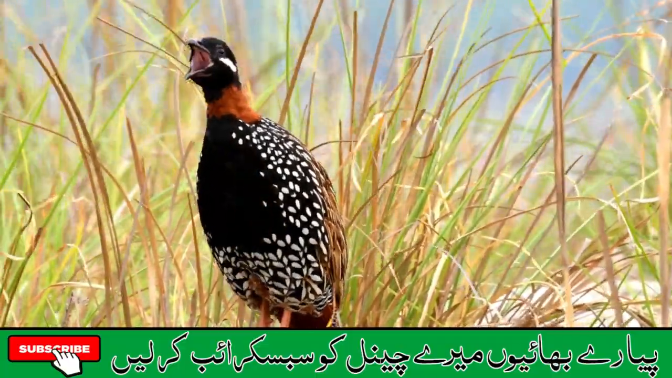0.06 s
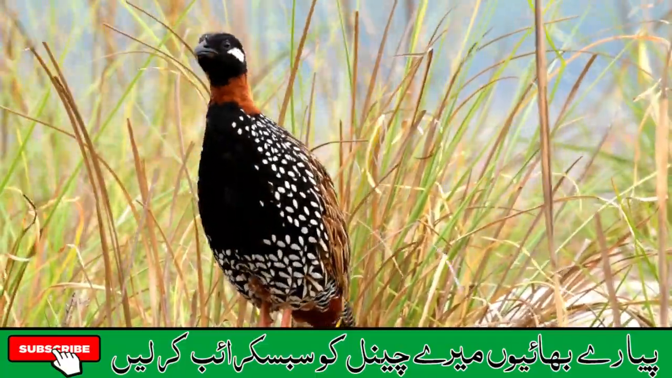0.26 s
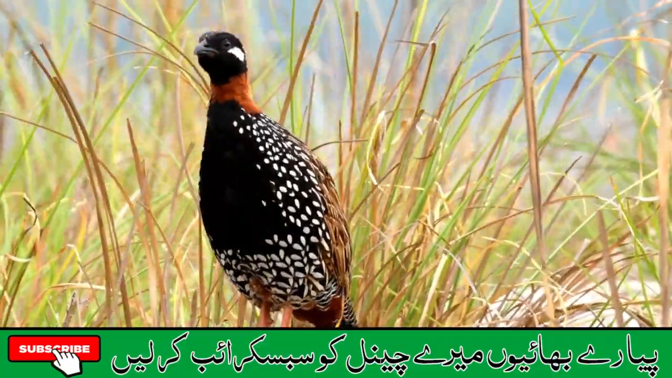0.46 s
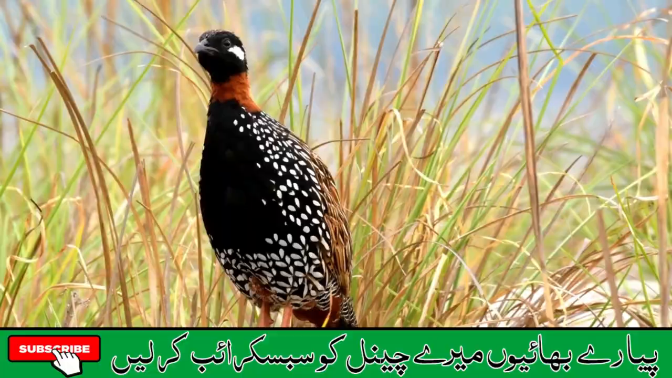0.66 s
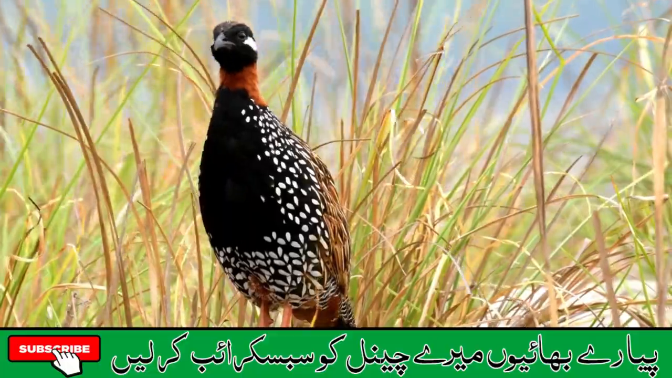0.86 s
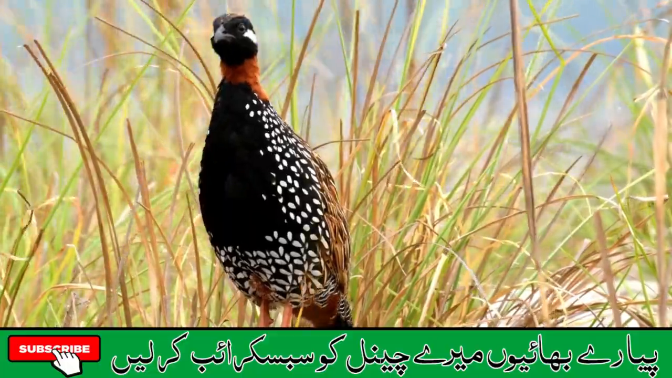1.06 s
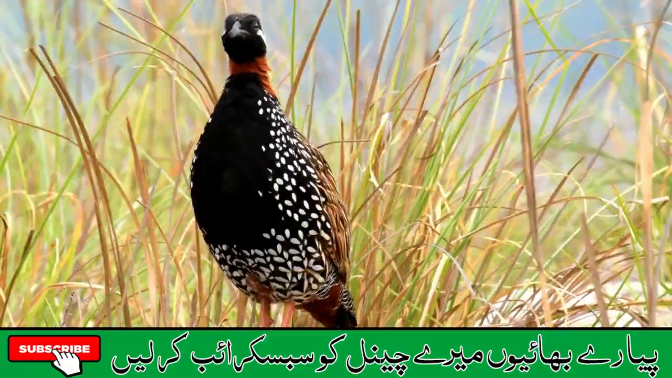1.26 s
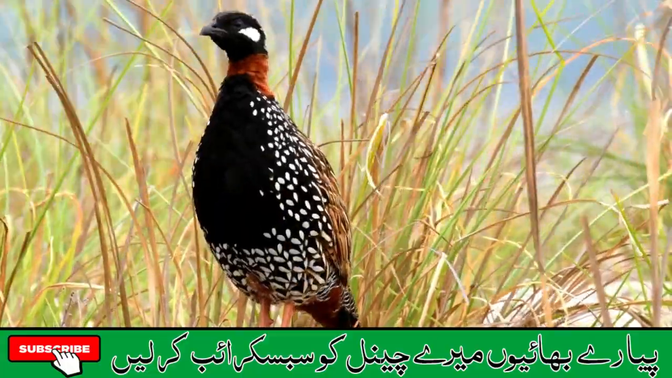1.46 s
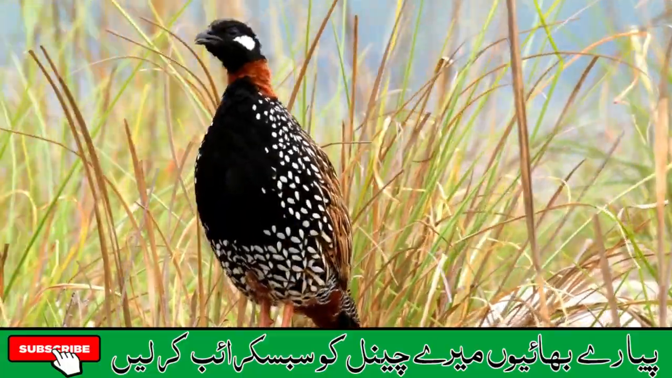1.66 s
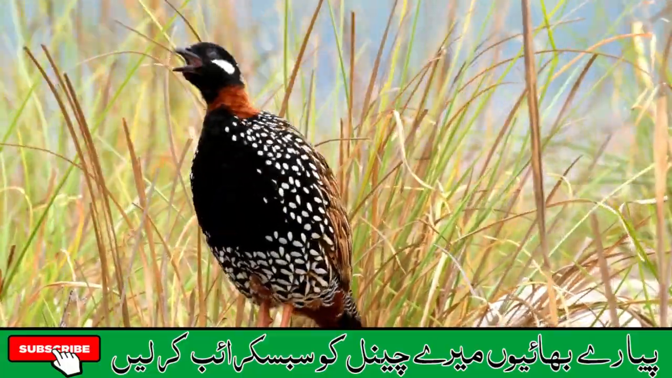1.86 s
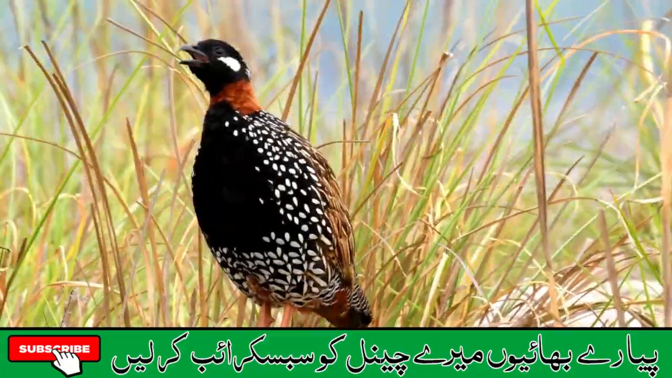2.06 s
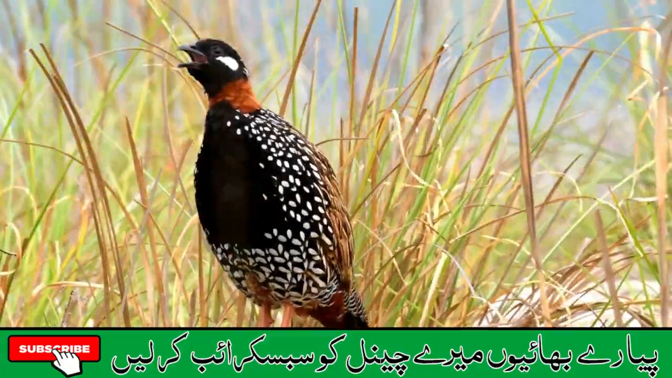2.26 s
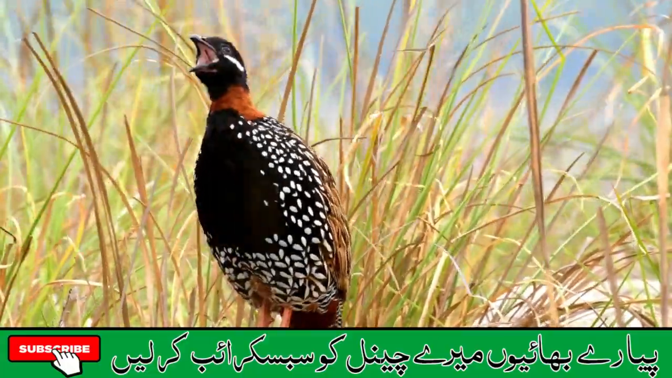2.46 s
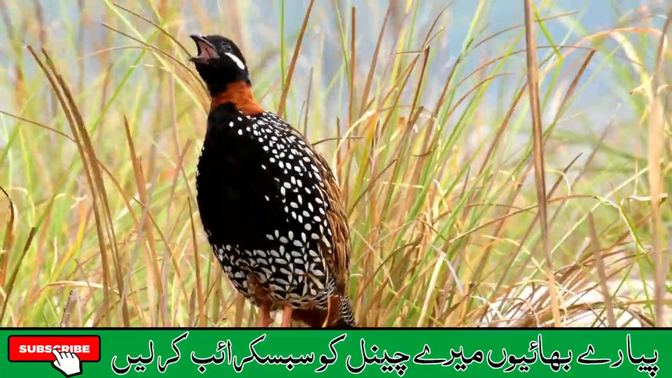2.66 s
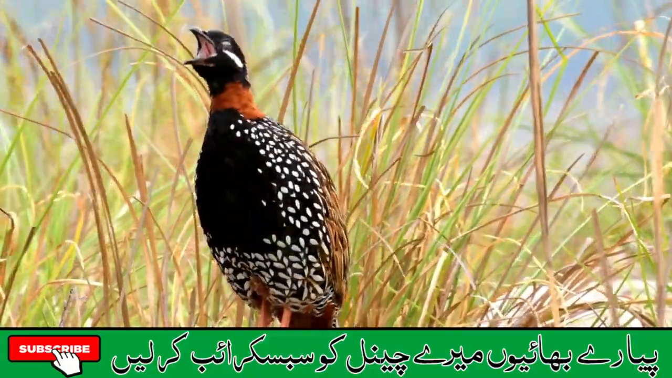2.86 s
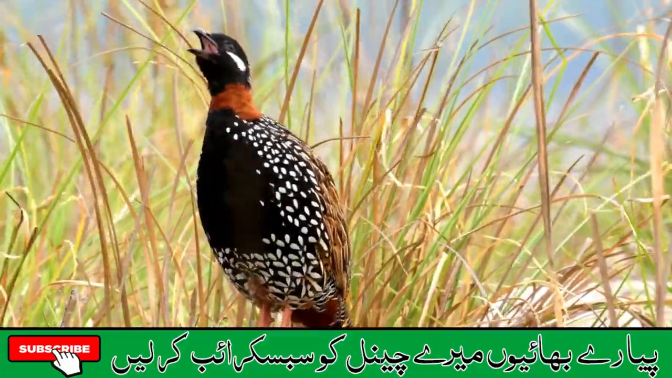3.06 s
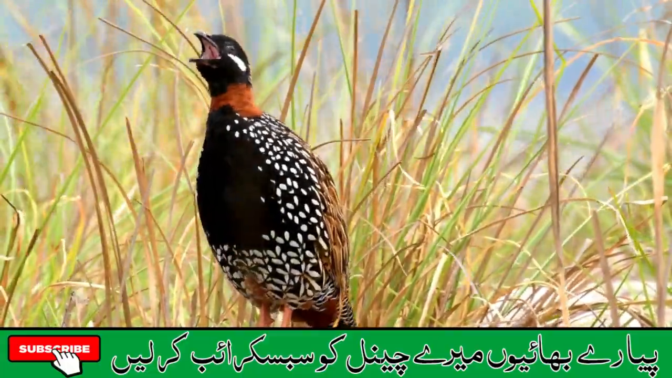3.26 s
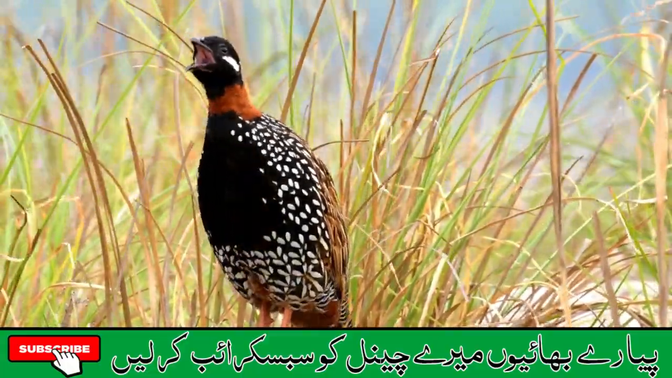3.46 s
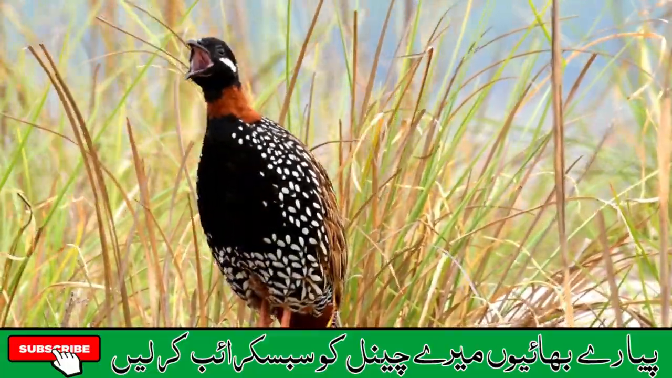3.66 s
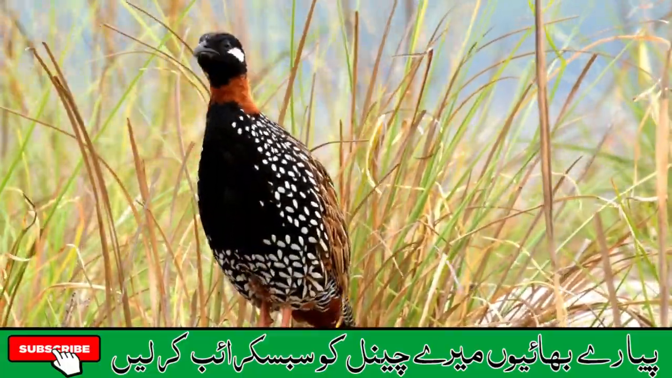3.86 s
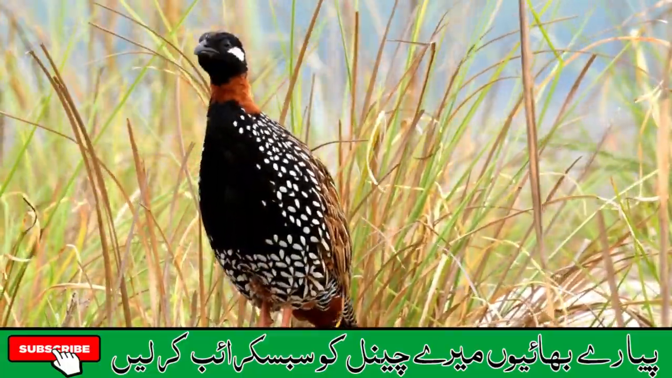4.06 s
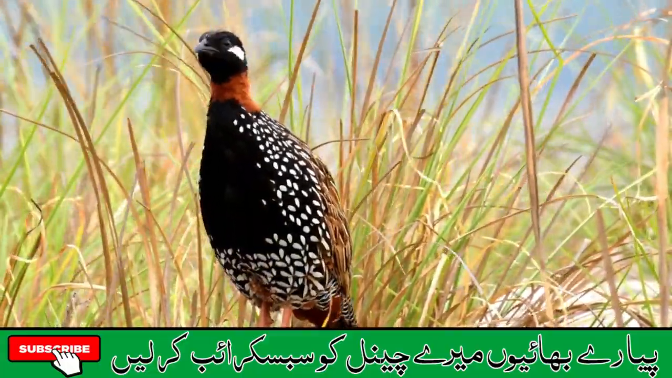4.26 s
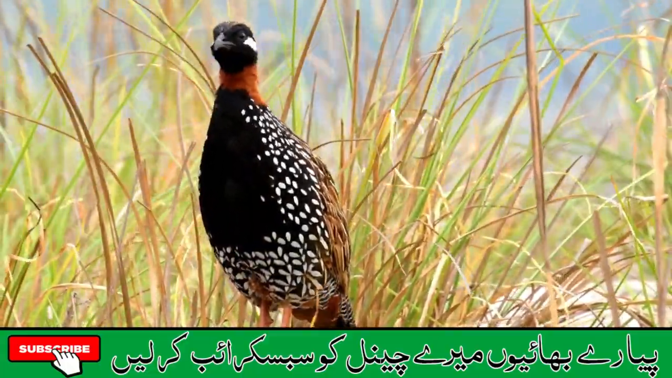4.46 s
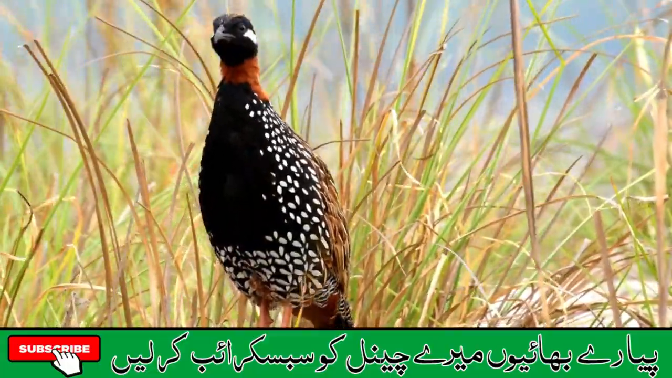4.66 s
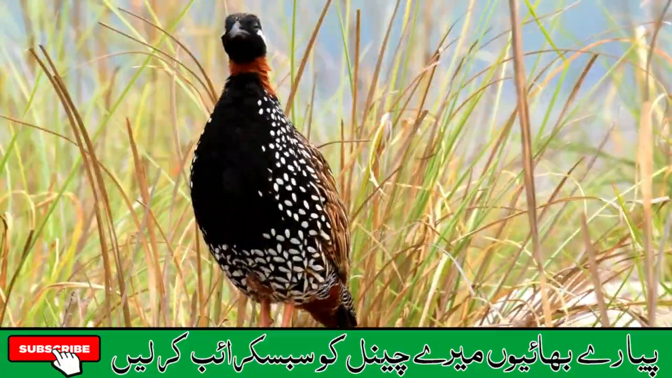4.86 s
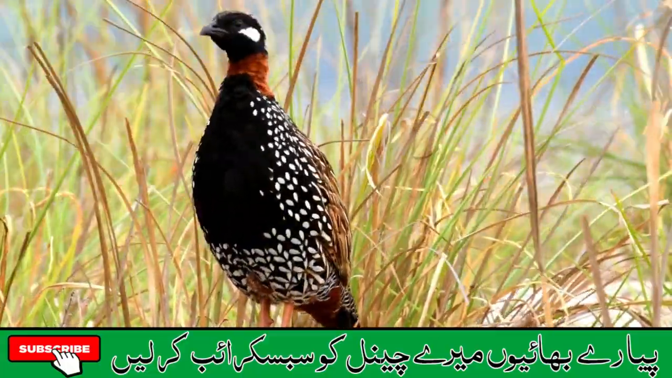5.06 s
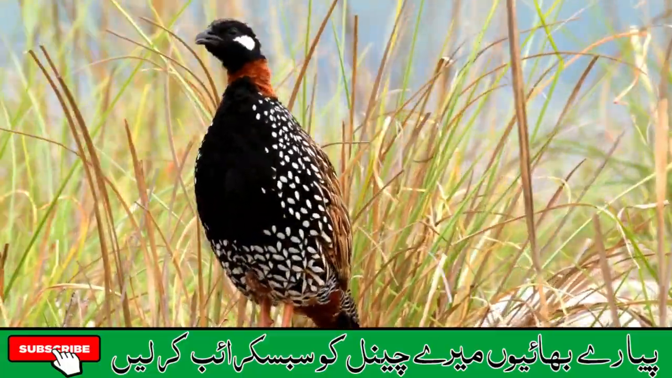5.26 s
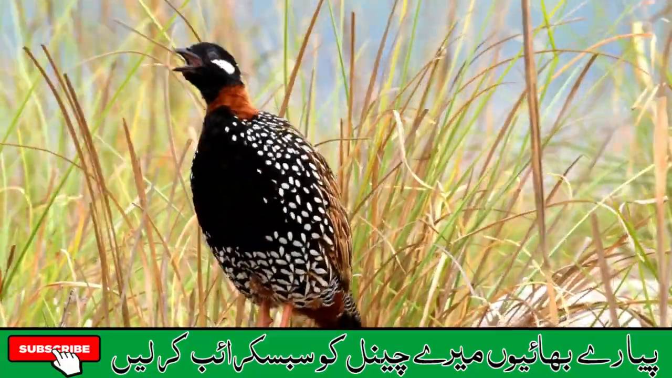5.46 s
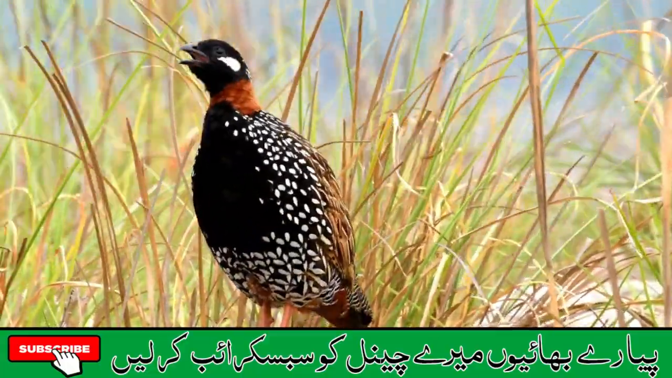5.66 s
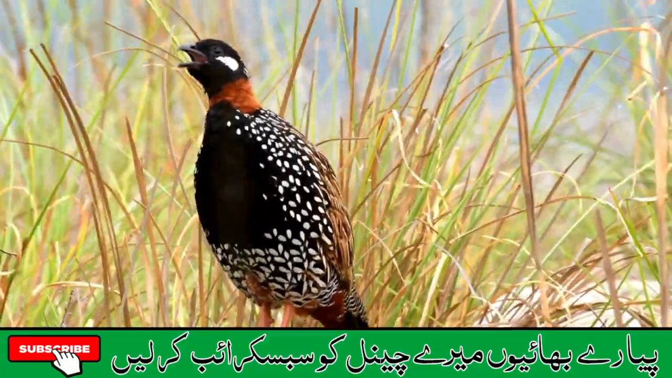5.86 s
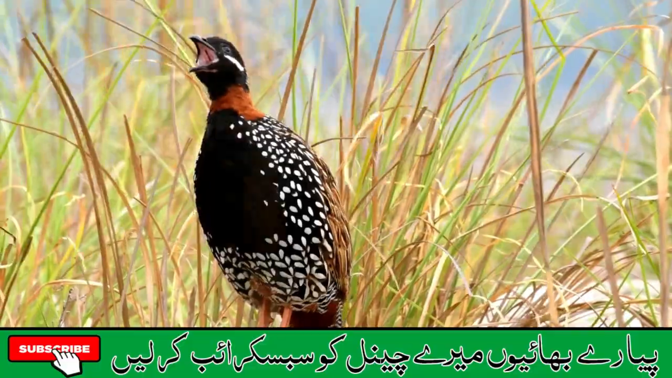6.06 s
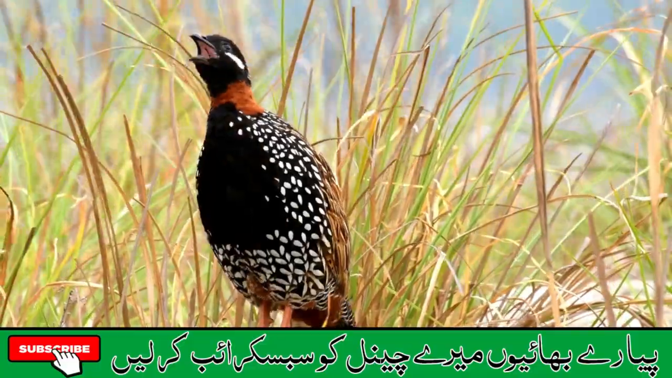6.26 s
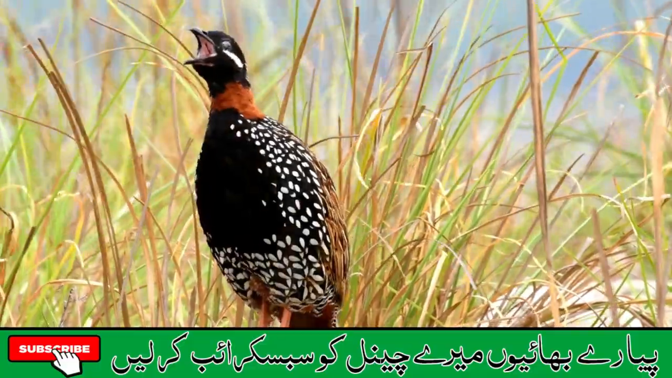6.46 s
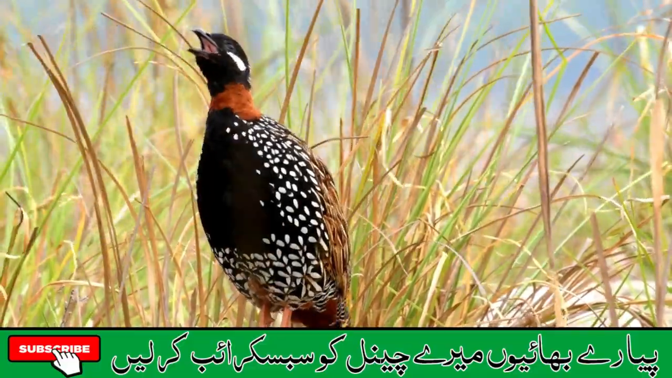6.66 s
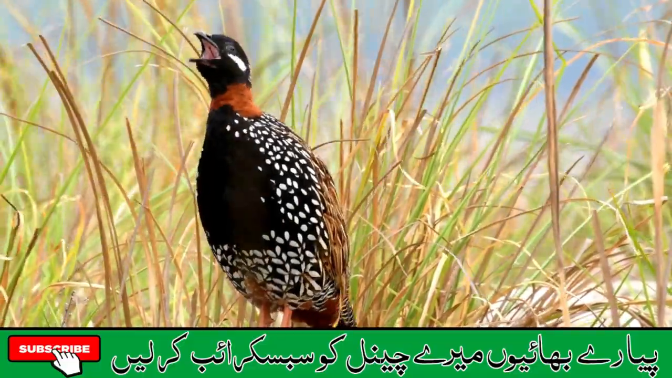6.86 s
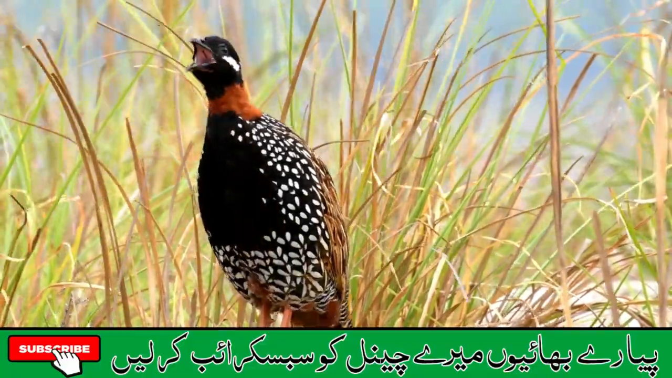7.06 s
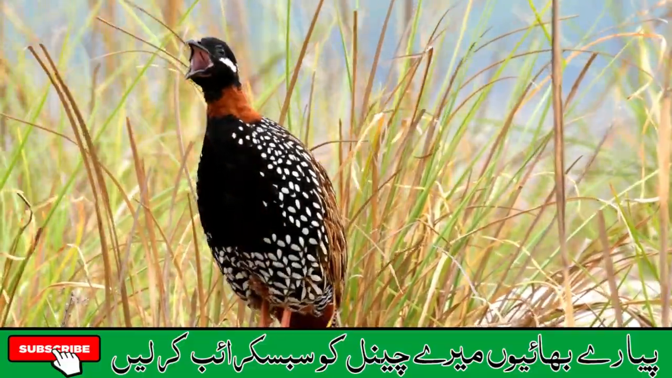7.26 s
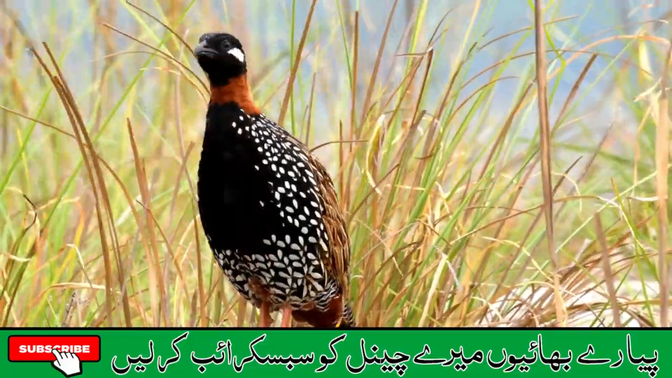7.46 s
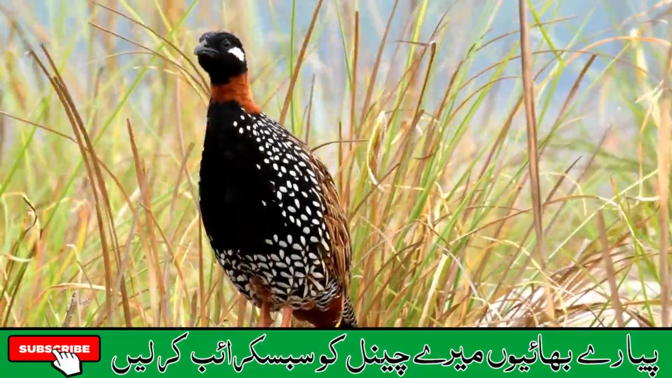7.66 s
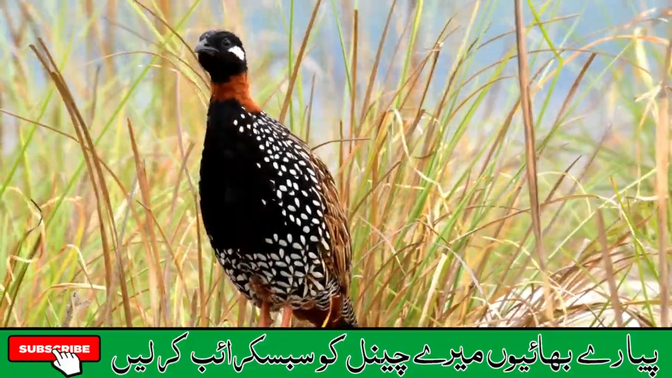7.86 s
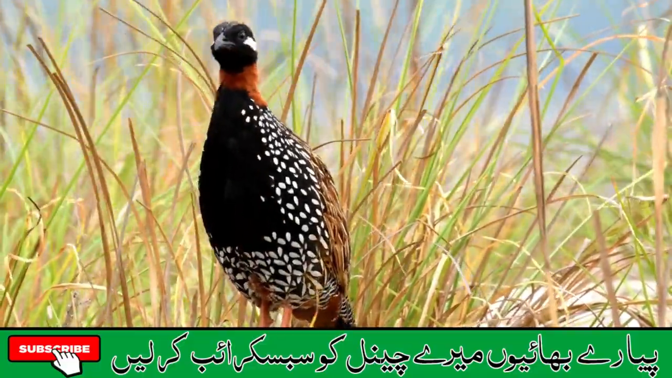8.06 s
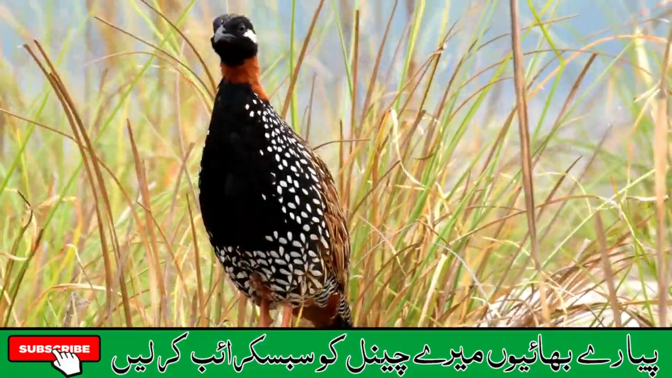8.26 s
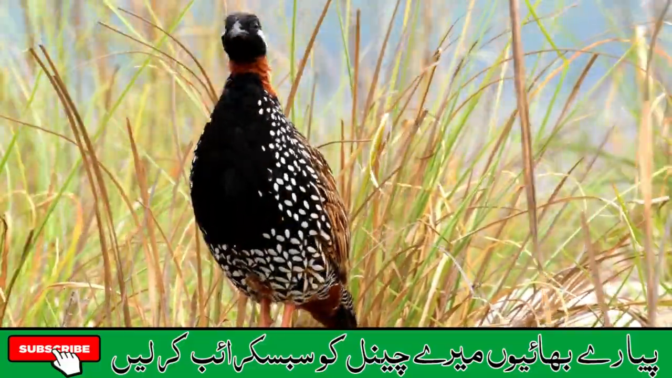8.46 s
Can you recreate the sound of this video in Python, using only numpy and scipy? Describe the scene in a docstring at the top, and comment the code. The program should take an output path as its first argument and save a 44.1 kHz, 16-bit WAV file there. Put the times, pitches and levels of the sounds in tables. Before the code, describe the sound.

A game bird calls close by in tall grass. It ends one phrase with a harsh rasp, pauses, then twice gives a sharp chip followed by four shrill, grating notes. In the gaps a distant bird peeps very faintly. Wind rumbles and thumps on the microphone throughout, mostly on the right, over a faint hiss of grass.

```python
"""Wind buffets two microphone ports, mostly the right one, over a faint hiss of tall grass.
A black francolin is just ending its call; then a far bird peeps faintly. At about 2 s the francolin
calls anew: a sharp chip, then four grating notes. Each rasp is a whistle swept down and up about 250
times a second through an arching beak resonance; when the sweep locks, a pure whistle breaks through.
The whole stretch comes round every 3.6 s."""
import sys
import numpy as np
from scipy import signal
from scipy.fft import rfft, irfft, next_fast_len
from scipy.io import wavfile
from scipy.ndimage import uniform_filter1d, map_coordinates

SR = 44100
rng = np.random.default_rng(int(sys.argv[2]) if len(sys.argv) > 2 else 0)


def store_pcm(level_fs):
    """Save levels as 16-bit WAV."""
    pcm = np.round(np.clip(level_fs, -1, 1) * 32767).astype(np.int16)
    wavfile.write(sys.argv[1], SR, np.atleast_2d(pcm).T)


N = 375732
ROUND_START_S, ROUND_S = 1.3, 3.6
# Times in the tables are read on this looping clock: it starts at 3.6 s and jumps from 4.9 back to 1.3.
CLOCK = ROUND_START_S + (np.arange(N) / SR - ROUND_START_S) % ROUND_S
LEFT, RIGHT = 0, 1


def from_db(db):
    """Turn decibels into a number to multiply by."""
    return 10 ** (np.asarray(db) / 20)


def rms_one(x):
    """Scale a sound so that its average strength (rms) is 1."""
    return x / np.sqrt(np.mean(x ** 2) + 1e-20)


def in_time(rows):
    """Join a table's points with straight lines along the clock, one curve per column."""
    times, *columns = np.transpose(rows)
    return [np.interp(CLOCK, times, column) for column in columns]


def gate(start, end, edge_s):
    """Switch on between start and end, with short fades."""
    return np.clip(np.minimum(CLOCK - start, end - CLOCK) / edge_s + .5, 0, 1)


def drift(hz):
    """A random wobble of typical size 1, up to about hz times a second."""
    low_pass = signal.butter(2, min(hz, SR / 4), fs=SR, output="sos")
    return rms_one(signal.sosfilt(low_pass, rng.standard_normal(N + SR))[SR:])


def colour(x, spectrum):
    """Turn each frequency up or down, following (f/Hz, level/dB) points."""
    hz, db = np.transpose(spectrum)
    bins_hz = np.fft.rfftfreq(len(x), 1 / SR)
    gain = from_db(np.interp(np.log(bins_hz + 1), np.log(hz), db))
    return irfft(rfft(x) * gain, len(x))


def noise(spectrum, size=N):
    """Noise of strength 1 with the given colour (its balance of low and high)."""
    white = rng.standard_normal(next_fast_len(size))
    return rms_one(colour(white, spectrum)[:size])


def tone(hz):
    """A pure tone of strength 1 on a moving pitch."""
    return np.sqrt(2) * np.sin(2 * np.pi * np.cumsum(hz) / SR)


# The colour of the grass hiss: f/Hz, level/dB
GRASS_COLOUR = [(100, 9.5), (600, 7), (1200, -1.5), (2500, -3.5), (3800, -3.5), (5600, -1), (7100, -1),
                (8500, -5), (9500, -14.5), (12000, -41.5)]
# A short soft hiss once each round: t/s, level/dB
HISS_SWELL = [(1.3, -53), (1.305, -44), (1.335, -44.5), (1.355, -50), (1.37, -80)]

def grass(level_db=-57.5):
    """The grass hisses faintly and evenly. Separately, a short soft hiss sounds as each round begins."""
    each_side = np.array([noise(GRASS_COLOUR), noise(GRASS_COLOUR)])
    shared = noise(GRASS_COLOUR)
    steady = from_db(level_db) * rms_one(shared + 1.8 * each_side)
    return steady + from_db(in_time(HISS_SWELL)[0]) * shared


# The colour of the wind's rumble when its swirls pass at the rate table_hz: f/Hz, level/dB
SWIRL_COLOUR = [(15, -27), (50, -9), (100, 1), (240, -2.5), (400, -10), (700, -25), (1200, -51.5),
                (2500, -63), (5000, -100)]
# Gusts (+) and lulls (-) on top of the breeze: middle t/s, length/s, left level/dB, right level/dB
GUSTS_AND_LULLS = [(1.418, .16, 13, 0), (1.731, .2, 24.5, 0), (1.89, .24, 15, 1.5), (2.197, .6, 9, 0),
                   (2.711, .08, 12, 0), (2.533, .42, 19, 0), (2.995, .08, 0, 3), (3.239, .16, 13, 0),
                   (3.345, .12, 9, -3), (3.478, 0.065, 8, 0), (3.563, .08, 0.5, -10), (3.624, .12, 14, 0),
                   (3.784, .1, -4, -13), (3.898, .08, 11, 2), (4.109, .18, 3, 4.5), (4.167, .18, 17.5, 0),
                   (4.253, .18, 4, 3), (4.455, .06, 5, 4), (4.609, .12, -3, -9), (4.79, .22, 0, 6)]

def wind(port, breeze_db, breeze_hz, surge_db, octaves_per_db, hurry=.21, table_hz=221.8):
    """Swirls of air pass a port (a microphone opening); gusts and surges make them louder and quicker."""
    gust_db = sum(rise_db[port] * np.cos(np.pi * np.clip((CLOCK - middle) / length, -.5, .5)) ** 2
                  for middle, length, *rise_db in GUSTS_AND_LULLS)
    swirl_hz = breeze_hz * 2 ** (octaves_per_db * gust_db)
    surge = 2 * np.tanh(drift(28) / 2)
    # Faster air runs through the same swirls sooner, so the rumble rises in pitch.
    travel = np.cumsum(swirl_hz / table_hz * np.exp(hurry * (surge - 1)))
    swirls = noise(SWIRL_COLOUR, size=2 * N)
    pressure = map_coordinates(swirls, [travel], order=3, mode="wrap") * from_db(surge_db * surge)
    return from_db(breeze_db + gust_db) * rms_one(pressure)


# Single hard thumps of wind: t/s, peak level/dB, f/Hz, port (LEFT or RIGHT)
WIND_THUMPS = [(1.311, -5, 302, RIGHT), (1.664, -9.5, 303, RIGHT), (1.697, -17, 377, RIGHT),
               (2.164, -11, 198, RIGHT), (2.245, -10, 200, RIGHT), (2.313, -12.5, 250, RIGHT),
               (2.332, -18, 417, RIGHT), (4.062, -17, 287, RIGHT), (4.073, -9, 282, RIGHT),
               (4.098, -15.5, 447.5, RIGHT), (4.14, -13, 379, RIGHT), (4.749, -7.5, 397, RIGHT),
               (4.816, -24, 322, RIGHT), (1.745, -8, 261, LEFT), (1.782, -11.5, 196, LEFT),
               (1.785, -5.5, 230, RIGHT), (1.902, -7, 200, LEFT), (2.029, -12, 253.2, RIGHT),
               (2.064, -13, 220, RIGHT), (3.2, -18.5, 401, RIGHT), (3.234, -20, 286, RIGHT),
               (1.91, -7.5, 395, RIGHT), (1.922, 1.5, 173, RIGHT), (2.831, -11, 272, RIGHT),
               (3.228, -22.5, 152, LEFT), (3.313, -17.5, 308, RIGHT), (3.617, 3, 170, LEFT),
               (3.623, -7.5, 113.2, LEFT), (4.222, -12, 382, RIGHT), (4.252, -5.5, 332, RIGHT),
               (4.278, -5, 395, RIGHT), (4.45, -11.5, 420, RIGHT), (4.458, -7, 352, RIGHT),
               (4.553, -14.5, 248, RIGHT), (4.729, -4.5, 445, RIGHT)]

def buffets():
    """Each thump is one hard swirl crossing a port: a push with a dip before and after."""
    out = np.zeros((2, N))
    for middle, peak_db, hz, port in WIND_THUMPS:
        distance_squared = (np.pi * hz * (CLOCK - middle)) ** 2 / 2
        out[port] += from_db(peak_db) * (1 - 5 * distance_squared) / (1 + distance_squared) ** 4
    return out


def field_echoes(x, stand_s=.065, stand_spread_s=.086):
    """Close stems scatter a call, a far stand of grass holds it briefly; a tail and an echo follow."""
    t = np.arange(int(.7 * SR)) / SR

    def fade(delay_s, fall_s):
        """Begin after delay_s, then drop 60 dB in fall_s."""
        return from_db(-60 * abs(t - delay_s) / fall_s) * (t > delay_s)

    stems, tail, late_echo = fade(.002, .022), fade(.002, .11), fade(.228, .1)
    stand = np.exp(-((t - stand_s) / stand_spread_s) ** 2 / 2) * (t < 2 * stand_s)
    echoes = sum(from_db(db) * shape * rng.standard_normal(len(t)) / np.linalg.norm(shape)
                 for db, shape in ((-6.5, stems), (-24, tail), (-45.5, late_echo), (-25, stand)))
    return signal.fftconvolve(x, echoes)[:N]


def arch(start, end, start_hz, middle_hz, end_hz, db):
    """Pitch and loudness of one whistle that bends through three pitches."""
    along = np.clip((CLOCK - start) / (end - start), 0, 1)
    bow = (middle_hz - (start_hz + end_hz) / 2) * (1 - (2 * along - 1) ** 2)
    hz = start_hz + (end_hz - start_hz) * along + bow
    return hz, from_db(db) * gate(start, end, edge_s=.0023)


# The far bird's peeps: start t/s, end t/s, start f/Hz, middle f/Hz, end f/Hz, level/dB
FAR_PEEPS = [(4.123, 4.17, 6350, 6240, 6380, -70), (4.183, 4.225, 5120, 5100, 5000, -64),
             (4.46, 4.503, 5150, 5000, 5020, -65.5), (4.679, 4.705, 3400, 3480, 3600, -68),
             (4.769, 4.81, 5170, 5940, 6380, -62.5), (4.806, 4.905, 6100, 6550, 6170, -79)]

def far_bird(waver_hz=130, flicker_db=3):
    """Faint wavering peeps, blurred by distance."""
    waver = waver_hz * drift(200)
    arches = (arch(*row) for row in FAR_PEEPS)
    peeps = sum(gain * tone(hz + waver) for hz, gain in arches) * from_db(flicker_db * drift(70))
    return peeps + field_echoes(peeps)


# The francolin's breathy puffs: start t/s, end t/s, level/dB
THROAT_PUFFS = [(2.82, 2.89, -51.5), (3.158, 3.218, -45.5), (3.204, 3.27, -51)]

def wheezes(band_hz=(1400, 7900), flicker_db=3):
    """Air slips through the slack throat around the second long note."""
    level = sum(from_db(db) * gate(start, end, edge_s=.028) for start, end, db in THROAT_PUFFS)
    band_pass = signal.butter(2, band_hz, "band", fs=SR, output="sos")
    air = rms_one(signal.sosfilt(band_pass, rng.standard_normal(N)))
    return level * air * from_db(flicker_db * drift(60))


# How strongly the throat and open beak pass each frequency: f/Hz, level/dB
THROAT_COLOUR = [(700, -28.5), (1300, -17.5), (2000, -18), (2450, -5.5), (2780, -2), (3250, -2),
                 (4300, 1.5), (5200, -2.5), (6500, 6.5), (7300, -3), (8750, 3), (9500, -14), (12000, -41)]

def breath(db):
    """The rush of air in the voice, coloured by the throat and beak."""
    return from_db(db) * noise(THROAT_COLOUR)


# The sharp chip that opens the call: t/s, f/Hz, level/dB
OPENING_CHIP = [(1.9745, 5230, -7.5), (1.977, 5310, -11), (1.984, 5470, -7), (1.9875, 5550, -2.5),
                (1.99, 5580, -7.5), (1.993, 5600, -6.5), (1.997, 5590, -16), (2.005, 5480, -15),
                (2.0075, 5380, -7)]
# Pure whistles that break through the rasp: start t/s, end t/s, start f/Hz, middle f/Hz, end f/Hz,
# level/dB
PURE_WHISTLES = [(2.513, 2.517, 4920, 4860, 4840, -8.5), (3.014, 3.057, 5410, 5690, 5130, -9),
                 (3.778, 3.8, 5020, 5650, 4840, -8)]

def whistles(waver_hz=35, chip_waver_hz=110, shimmer_db=1.0):
    """With no flutter the voice box sings clean: the opening chip and the whistles inside the notes."""
    waver, air = drift(310), breath(db=-28)
    chip_hz, chip_db = in_time(OPENING_CHIP)
    chip_gain = from_db(chip_db) * gate(start=1.9735, end=2.009, edge_s=.0015)
    out = chip_gain * (tone(chip_hz + chip_waver_hz * waver) + air)
    for row in PURE_WHISTLES:
        hz, gain = arch(*row)
        out += gain * (tone(hz + waver_hz * waver) + air)
    return out * from_db(shimmer_db * drift(100))


def keep_above(x, edge_hz):
    """Slide the sound down by a moving edge_hz, drop what falls below zero, and slide it back."""
    turn = np.exp(2j * np.pi * np.cumsum(edge_hz) / SR)
    shifted = np.fft.fft(signal.hilbert(x) / turn)
    return np.real(np.fft.ifft(shifted * (np.fft.fftfreq(N) > 0)) * turn)


def beak_ring(x, hz, width_hz=420):
    """The beak's piercing resonance: it picks out the sound near one moving pitch."""
    turn = np.exp(2j * np.pi * np.cumsum(hz) / SR)
    decay = np.exp(-np.pi * width_hz / SR)
    return 2 * np.real(signal.lfilter([1 - decay], [1, -decay], x / turn) * turn)


def evened(x, window_s=.0097):
    """Even out the loudness, holding the strength near 1."""
    return x / np.sqrt(np.abs(uniform_filter1d(x ** 2, int(window_s * SR))) + 1e-9)


# Two tiny rasps around the chip, then four long ones; the voice is given at the crest of effort:
# start t/s, crest t/s, end t/s, fade-in/s, fade-out/s, level/dB, middle f/Hz, sweep to either side/Hz,
# sweep rate/Hz, roughness (0-1), beak f/Hz, beak level/dB, creak level/dB
RASP_NOTES = [(1.938, 1.942, 1.975, 0.008, 0.033, -24.5, 3306, 1500, 235, 0.88, 4900, -11, -7),
              (2.007, 2.011, 2.044, 0.0025, 0.046, -17, 3300, 901, 240, .8, 5300, -6.5, -10),
              (2.51, 2.614, 2.701, 0.0016, 0.02, -9.5, 4301, 1295, 264, .25, 5100, -2.5, -21),
              (2.878, 3.001, 3.167, 0.022, 0.027, -10.5, 4068, 1330, 254.4, 0.2, 4960, -0.5, -14.5),
              (3.468, 3.554, 3.615, 0.023, 0.013, -10.5, 4050, 1366, 243, 0.3, 5050, 1, -23.5),
              (3.687, 3.787, 3.936, 0.014, 0.029, -10.5, 3974, 1358, 234, 0.32, 4930, 2, -21.5)]

def voice_box(stumble=.4, recover_s=.05, climb_s=.012, arch_power=1.9, slack_roughness=.58):
    """Effort rises and falls over each note and steers the voice, which roughens as it goes slack."""
    # After a whistle the bird loses some of its effort, then recovers.
    poise = 1 - stumble * sum((CLOCK > end) * np.exp(-abs(CLOCK - end) / recover_s)
                              for _, end, *_ in PURE_WHISTLES)
    near_whistle = sum(np.exp(-np.maximum(np.maximum(start - CLOCK, CLOCK - end), 0) / climb_s)
                       for start, end, *_ in PURE_WHISTLES)
    controls = np.zeros((8, N))
    for start, crest, end, fade_in_s, fade_out_s, *voice in RASP_NOTES:
        db, middle_hz, span_hz, rate_hz, roughness, beak_hz, beak_db, creak_db = voice
        during = (CLOCK > start) & (CLOCK < end)
        t, near = CLOCK[during], near_whistle[during]
        effort = poise[during] * (1 - np.interp(t, [start, crest, end], [1, 0, 1]) ** arch_power)
        slack = 1 - effort
        fade = np.minimum(np.minimum((t - start) / fade_in_s, (end - t) / fade_out_s), 1) ** 2
        climb = 1 + .025 * near   # pitch and beak ring rise next to a whistle
        bend = (1 - .145 * slack) * climb   # pitch and sweep rate sag as effort drops
        controls[:, during] = (fade * from_db(db - 4.5 * slack),
                               middle_hz * bend,
                               span_hz + 448 * slack ** 2,
                               rate_hz * bend,
                               roughness + (slack_roughness - roughness) * slack,
                               beak_hz * (1 - .069 * slack) * climb,
                               from_db(beak_db - 13.5 * slack ** 2 + 4.5 * near),
                               np.full_like(t, from_db(creak_db)))
    return controls


# The colour of the slack throat's creak, strongest at the edges of a note: f/Hz, level/dB
CREAK_COLOUR = [(500, -35.5), (900, -23.5), (1350, 4), (1650, -10.5), (2000, 6.5), (2500, -0.5),
                (3500, -24.5)]

def rasp(skew=.79, octave_db=-15, third_harmonic_db=-25, held_db=-15, margin_hz=280, lock_s=.003):
    """A flutter sweeps the whistle down and up, never twice quite alike, so fast that it grates."""
    level, middle_hz, span_hz, rate_hz, roughness, beak_hz, beak_gain, creak_gain = voice_box()
    flutter = 2 * np.pi * np.cumsum(rate_hz * (1 + .06 * roughness * drift(150))) / SR
    waver = 1 + .008 * drift(30)
    swing = span_hz / np.maximum(rate_hz, 1) * (1 + .31 * roughness * drift(250) + .054 * drift(25))
    sweep = swing * np.sin(flutter) + skew * np.cos(2 * flutter)
    jitter = 1.25 * roughness * drift(330)
    phase = 2 * np.pi * np.cumsum(middle_hz * waver) / SR + sweep + jitter
    voice = np.sin(phase) + from_db(octave_db) * np.sin(2 * phase)
    voice += from_db(third_harmonic_db) * np.sin(3 * phase)
    voice *= from_db(2 * np.cos(2 * flutter) - np.cos(flutter))   # loudest where the sweep turns
    # A trace of the high pitch lingers between sweeps.
    held_hz = (middle_hz + 4 * rate_hz) * waver + 150 * roughness * drift(200)
    voice += from_db(held_db) * tone(held_hz) + roughness * breath(db=-12)
    lowest_hz = np.maximum(middle_hz - span_hz - margin_hz, 0)
    voice = keep_above(colour(voice, THROAT_COLOUR), lowest_hz)
    voice += beak_gain * beak_ring(voice, beak_hz)
    # The slack throat creaks at the bottom of each sweep.
    creak = creak_gain * roughness ** 2 * noise(CREAK_COLOUR) * (1 - np.cos(flutter))
    whistling = sum(gate(start, end, lock_s) for start, end, *_ in PURE_WHISTLES)
    return level * np.clip(1 - whistling, 0, 1) * (from_db(-1) * evened(voice) + creak)


# Quick echoes off the ground and things close by: delay/ms, share of the sound (minus flips the wave)
NEAR_BOUNCES = [(.892, -.22), (1.424, .15), (1.812, .14), (2.232, -.12)]

def bounced(x):
    """The sound plus its first reflections."""
    t = np.arange(N) / SR
    return x + sum(share * np.interp(t - ms / 1000, t, x) for ms, share in NEAR_BOUNCES)


def francolin(level_db=-.29, lower_hz=2750, lower_width_hz=700):
    """The call reaches each port directly and through the grass; the left favours its lower voice."""
    call = from_db(level_db) * (bounced(rasp()) + whistles() + wheezes())
    lower = signal.lfilter(*signal.iirpeak(lower_hz, lower_hz / lower_width_hz, fs=SR), call)
    left, right = .87 * call + .26 * lower, 1.08 * call - .36 * lower
    return np.array([side + field_echoes(side) for side in (left, right)])


def scene():
    """Two birds, wind on both ports, and grass."""
    sheltered = wind(LEFT, breeze_db=-41.5, breeze_hz=122.4, surge_db=.5, octaves_per_db=.0437)
    exposed = wind(RIGHT, breeze_db=-20.5, breeze_hz=225.4, surge_db=4.0, octaves_per_db=.0655)
    return francolin() + far_bird() + np.array([sheltered, exposed]) + buffets() + grass()


def record(dry, dip_hz=7650, dip_width_hz=450, mic_top_hz=9600, cutoff_hz=17500):
    """The microphone loses one narrow band and the highest treble; the loudest peaks clip unevenly."""
    dip = signal.iirnotch(dip_hz, dip_hz / dip_width_hz, fs=SR)
    dipped = signal.lfilter(*dip, signal.lfilter(*dip, dry))
    picked_up = signal.sosfilt(signal.ellip(10, .3, 90, mic_top_hz, fs=SR, output="sos"), dipped)
    clipped = np.clip(picked_up, -1, .94)   # flattened peaks add overtones
    return signal.sosfilt(signal.ellip(10, .1, 90, cutoff_hz, fs=SR, output="sos"), clipped)


dry = scene()
out = record(dry)
store_pcm(out)
```